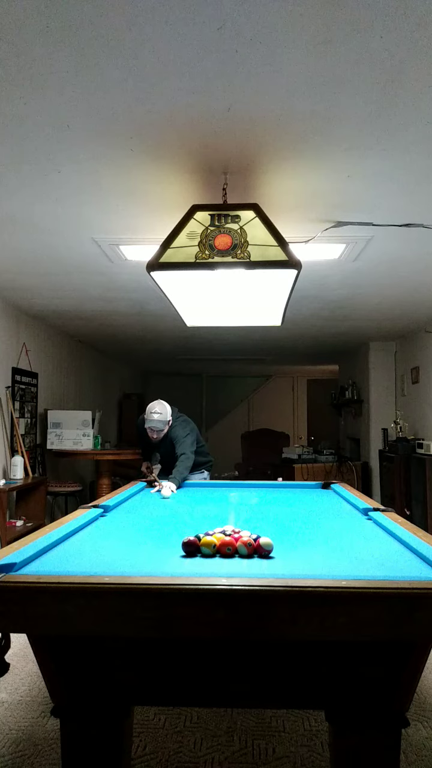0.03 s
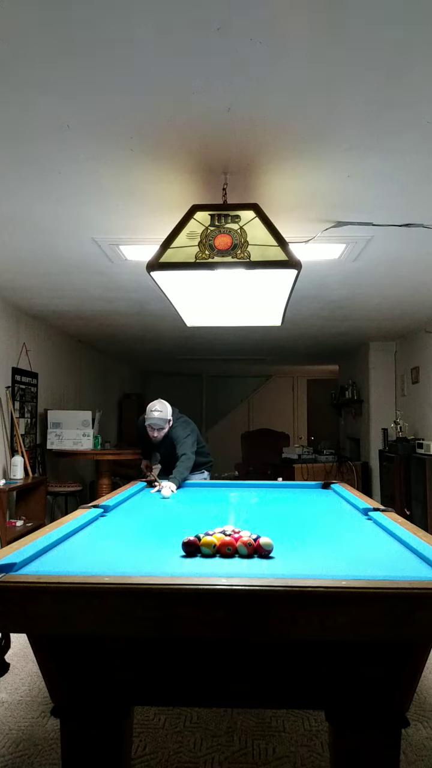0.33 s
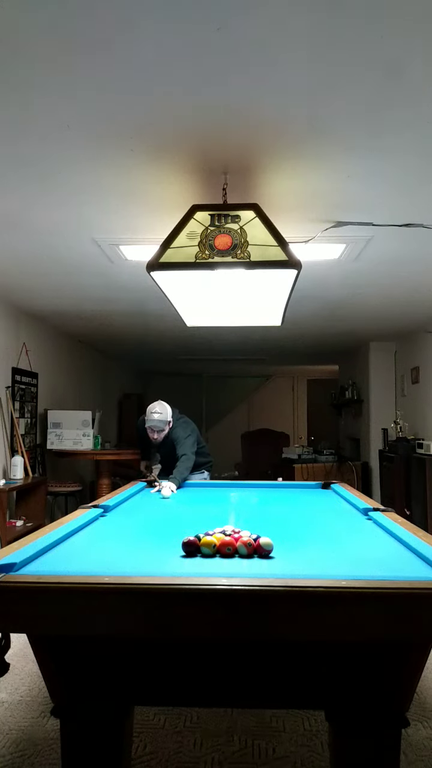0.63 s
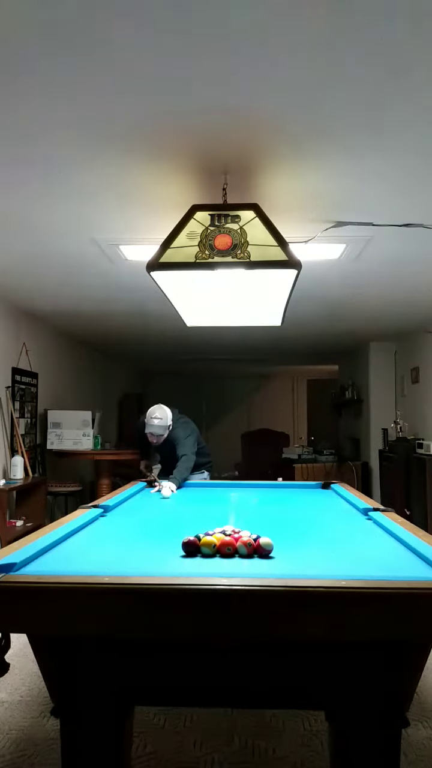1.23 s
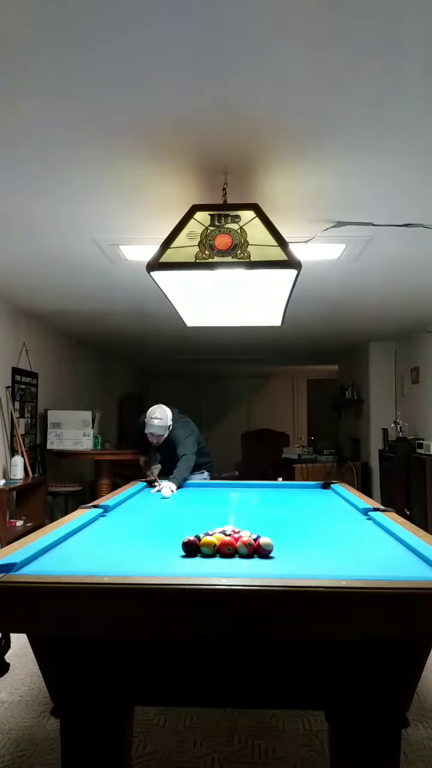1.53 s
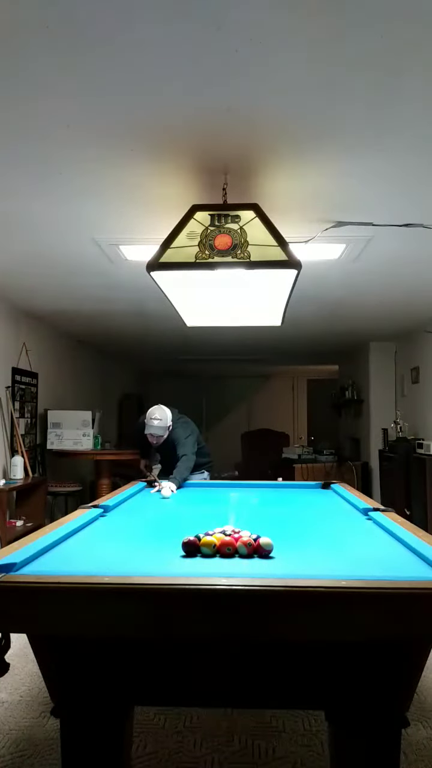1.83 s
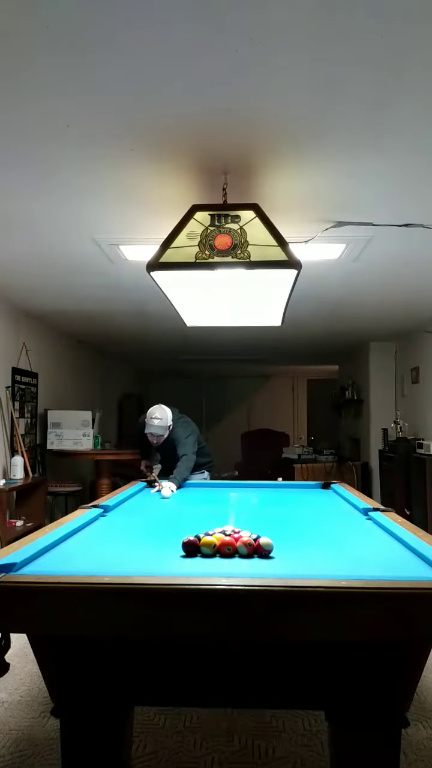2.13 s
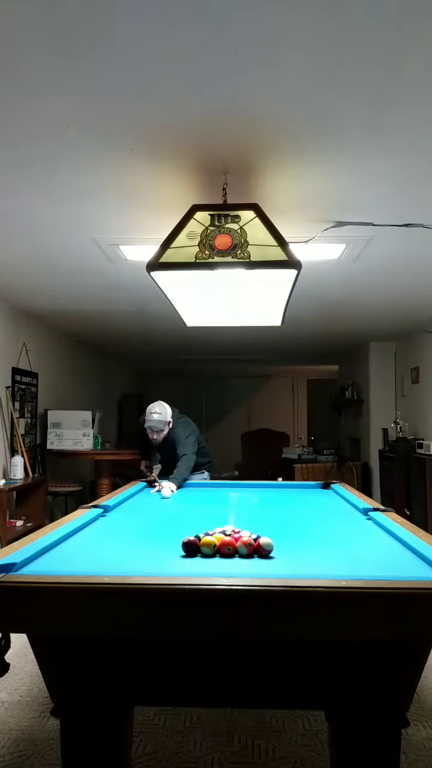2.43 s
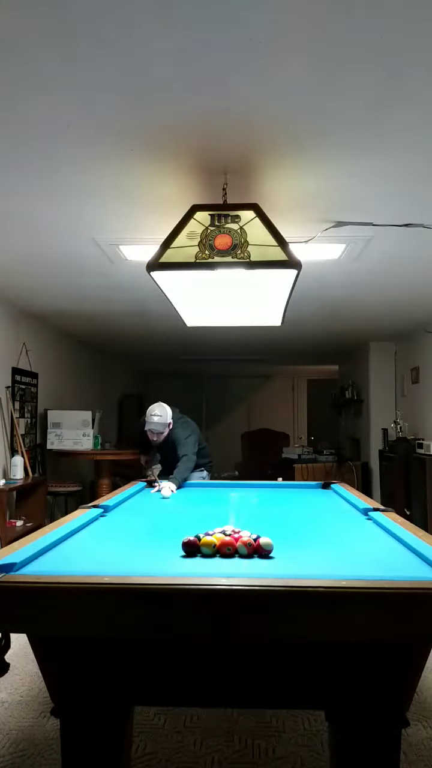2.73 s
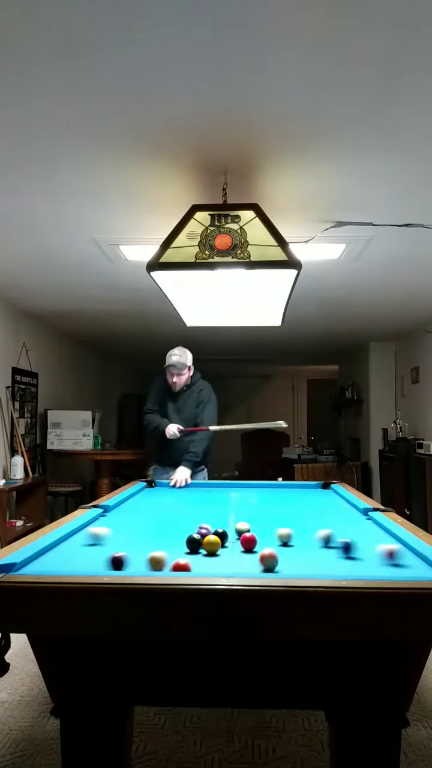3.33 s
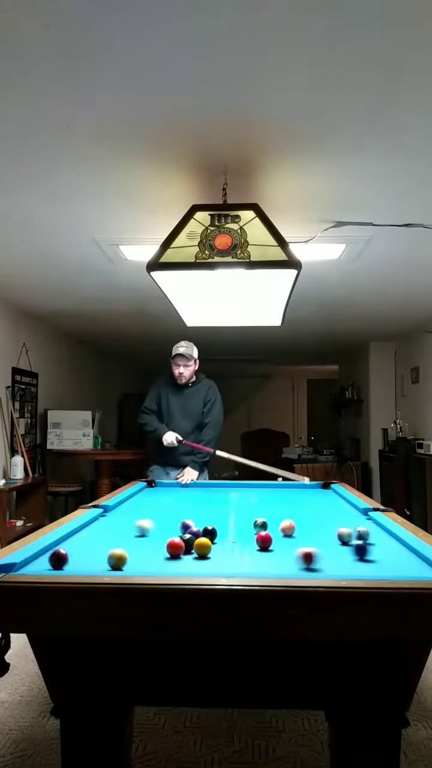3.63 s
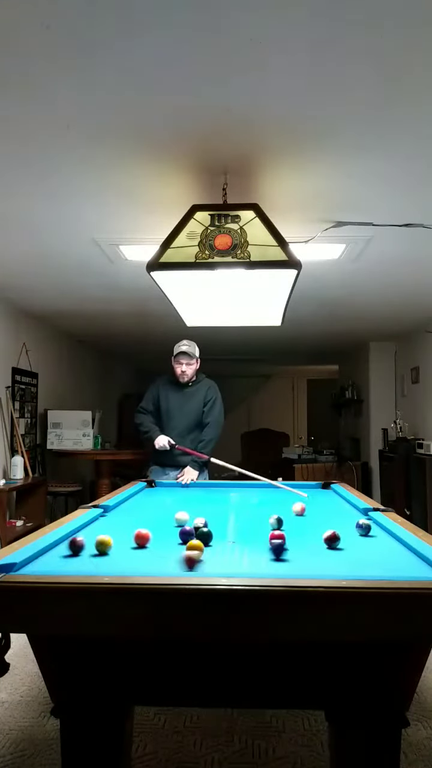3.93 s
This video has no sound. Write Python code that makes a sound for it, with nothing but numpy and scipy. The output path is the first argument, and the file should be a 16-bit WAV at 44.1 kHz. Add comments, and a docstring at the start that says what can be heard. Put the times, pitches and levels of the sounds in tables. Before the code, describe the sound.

A pool break is heard from close behind the rack in a quiet basement. For three seconds there is only a low ventilation drone and barely audible cue slides. At 3.1 seconds the cue gives a woody knock, and at about 3.3 the rack bursts with a loud, sharp crack. Balls thud and knock against the rails until 3.7, then clack together in two quick clusters around 3.8 and 3.9.

```python
"""A pool break in a quiet basement, heard from just behind the rack.
Faint practice strokes hiss, then the cue knocks the cue ball, which skips down the slate and cracks
into the rack. Balls thud into cushions, rattle at a pocket and clack together. Each contact is a short
pulse drawn out by the room; the wooden cue and table ring. The crack overloads the microphones and
ducks their gain. Ventilation drones underneath, dulled by a noise suppressor, with faint codec flicker."""
import sys
import numpy as np
from scipy import signal
from scipy.fft import rfft, irfft
from scipy.io import wavfile
from scipy.ndimage import uniform_filter1d

SR = 44100
rng = np.random.default_rng(int(sys.argv[2]) if len(sys.argv) > 2 else 0)


def wav_record(signal):
    """Record a signal, one row per channel, as 16-bit PCM in the file named by sys.argv[1]."""
    frames = np.transpose(np.atleast_2d(signal))
    bounded = np.clip(frames, -1, 1)
    # unit amplitude maps onto the largest positive 16-bit level
    quanta = np.round(bounded * 32767).astype(np.int16)
    wavfile.write(sys.argv[1], SR, quanta)


N = 176400


def rack_break():
    """The cue ball bursts the rack: hard balls crack without ringing, and the slate thumps."""
    # collisions: start_s, level_db, wet_db
    hits = [(3.2622, 29, 0.5), (3.308, 10, 10), (3.3626, 2.5, 11)]
    # crack spectrum: freq_hz, level_db
    crack_spectrum = [(30, -40.5), (80, -46), (400, -16.5), (800, -13), (1200, -4.5), (1650, 4),
                      (2150, -1.5), (2600, 4.5), (3100, -4), (4000, -14), (5200, -24.5), (6500, -34),
                      (9000, -39), (16000, -56)]
    # slate thump spectrum: freq_hz, level_db
    thump_spectrum = [(30, -16.5), (90, -7.5), (200, -0.5), (400, 0.5), (800, -5), (2000, -31), (8000, -67)]
    out, hz = np.zeros((2, N)), bins(4096)
    crack = pulse(curve(crack_spectrum, hz))
    for start_s, level_db, wet_db in hits:
        add(out, start_s, amp(level_db) * in_room(crack, wet_db))
    jolt = amp(20) * np.array([[1], [-0.3]])  # pushes the two microphones opposite ways
    add(out, hits[0][0], jolt * pulse(curve(thump_spectrum, hz)))
    return out


def ball_clacks():
    """Scattered balls meet more slowly; the longer contact notches the spectrum."""
    # contacts, with the 3.764 s clack repeated off ceiling and walls at 3.771, 3.781 and 3.790 s: start_s,
    # level_db, left_minus_right_db, wet_db
    hits = [(3.383, -3, -1, 8.5), (3.7639, 1.5, 2.5, 8), (3.7710, 2.5, 2, -1.5), (3.7810, -4, 1, -8),
            (3.7904, 1, 2, -6), (3.8723, -15, -10, 11), (3.8749, -3, 9, -4.5), (3.8778, 0, 3, -6),
            (3.888, -6, 6, 6.5)]
    # contact spectrum: freq_hz, level_db
    spectrum = [(30, -33), (100, -21), (400, -11.5), (850, -12), (1300, 0), (1900, -0.5), (2600, 0.5),
                (3400, -11.5), (4100, -32.5), (5000, -30), (6100, -37), (6600, -55.5), (7200, -37),
                (8200, -29.5), (9100, -44), (10100, -33), (11100, -42), (12000, -35), (13100, -42),
                (14200, -34), (16000, -52)]
    out = np.zeros((2, N))
    clack = pulse(curve(spectrum, bins(4096)))
    for start_s, level_db, pan_db, wet_db in hits:
        add(out, start_s, amp(level_db) * in_room(clack, wet_db, pan_db, echo_db=-7.5))
    return out


def cue_strike():
    """The shaft rings with a woody knock; the tip's snap arrives mostly off the walls."""
    # shaft modes: freq_hz, level_db, t60_s
    shaft_modes = [(370, -12, 0.25), (450, -2, 0.097), (688, 8, 0.021), (766, 10.5, 0.016), (870, 1, 0.013),
                   (950, -3, 0.023), (1270, -6, 0.092), (1557, -7.5, 0.15), (2190, -13.5, 0.045),
                   (2452, -7, 0.12), (2800, -10, 0.11)]
    # tip snap spectrum: freq_hz, level_db
    snap_spectrum = [(50, -45.5), (150, -21), (400, 1.5), (1200, 1), (2500, -2), (4300, -4), (5200, -11),
                     (8300, -10.5), (11000, -17.5), (13000, -27), (16000, -42.5)]
    start_s, contact_s, snap_lag_s = 3.1072, 0.0004, 0.00295
    out, t = np.zeros((2, N)), np.arange(SR // 2) / SR
    knock = ring(shaft_modes, t) * (1 - np.exp(-(t / contact_s) ** 2))
    knock = signal.sosfilt(signal.butter(2, 284, "high", fs=SR, output="sos"), knock)
    add(out, start_s, amp(12) * in_room(knock / np.linalg.norm(knock), wet_db=-6.5))
    snap = pulse(curve(snap_spectrum, bins(4096)))
    add(out, start_s + snap_lag_s, amp(13) * in_room(snap, wet_db=0, direct_db=-21.5))
    return out


def rail_knocks():
    """Balls hit rails and pocket jaws; the wooden table rings under each knock."""
    # impacts: start_s, level_db, left_minus_right_db
    hits = [(3.186, 6.5, 7), (3.537, 5.5, 1.5), (3.556, -7, -21), (3.578, 8.5, 2), (3.586, 5, -6),
            (3.612, -16, 7), (3.634, -6, -8), (3.664, -0.5, 0), (3.700, -10.5, 7)]
    # impact spectrum: freq_hz, level_db
    spectrum = [(30, -49.5), (100, -19), (260, -21.5), (380, 5.5), (480, 6.5), (680, 2.5), (790, -4),
                (900, -4.5), (1300, -13), (2600, -31), (4000, -55), (9000, -74.5), (16000, -89)]
    # table modes: freq_hz, level_db, t60_s
    table_modes = [(195, -3, 0.27), (265.6, -13, 0.4), (404, -0.5, 0.73), (481, 1, 0.229),
                   (676, -1.5, 0.39), (900, 0, 0.24)]
    out, hz = np.zeros((2, N)), bins(32768)
    wood = ring(table_modes, np.arange(len(hz)) / SR)
    knock = pulse(curve(spectrum, hz)) + amp(-7) * wood / np.linalg.norm(wood)
    for start_s, level_db, pan_db in hits:
        add(out, start_s, amp(level_db) * in_room(knock, wet_db=-4, pan_db=pan_db, direct_db=-7.5))
    return out


def ball_thuds():
    """Balls land on the slate or sink into a cushion: soft, low band-limited pulses."""
    # impacts: start_s, level_db, pitch_hz
    hits = [(3.137, 6.5, 321), (3.183, 5, 248), (3.223, 2, 262), (3.250, 4.5, 210), (3.386, 5, 140),
            (3.402, 1.5, 140.6), (3.476, 0, 146), (3.520, 1.5, 140), (3.554, 2.5, 161), (3.622, 6.5, 169),
            (3.660, 1.5, 200), (3.686, 0.5, 168), (3.706, -1.5, 160), (3.796, -11.5, 188)]
    low_db_per_oct, high_db_per_oct, width_oct = 26, 14, 0.47
    out, hz = np.zeros((2, N)), bins(32768)
    for start_s, level_db, pitch_hz in hits:
        octaves = np.log2((hz + 1) / pitch_hz)
        low_cut_db = low_db_per_oct * np.maximum(-octaves - width_oct, 0)
        high_cut_db = high_db_per_oct * np.maximum(octaves - width_oct / 2, 0)
        thud = pulse(-low_cut_db - high_cut_db)
        add(out, start_s, amp(level_db) * in_room(thud, wet_db=-3.5, direct_db=-10))
    return out


def cue_slides():
    """The shaft slides through the bridge hand; friction hiss swells with each stroke."""
    # strokes: start_s, length_s, level_db
    strokes = [(.05, 0.27, -86), (.4, .18, -84), (.62, .45, -82.5), (1.1, .45, -84), (1.62, .24, -82),
               (2.9, 0.074, -82), (3.023, 0.21, -73)]
    # friction spectrum: freq_hz, level_db
    spectrum = [(2500, -20), (3300, -1), (3800, -17), (4400, 0), (5300, -12), (6800, -15), (7800, 0),
                (8800, -12), (11500, -10), (15000, -24)]
    speed, t = np.zeros(N), np.arange(N) / SR
    for start_s, length_s, level_db in strokes:
        progress = np.clip((t - start_s) / length_s, 0, 1)
        speed += amp(level_db) * np.sqrt(np.abs(np.sin(np.pi * progress)))
    return speed * unit_rms(irfft(diffuse(N) * amp(curve(spectrum, bins(N)))))


def ventilation():
    """Three low resonances drone over the dull background noise."""
    # resonances: centre_hz, half_width_hz, level_db
    drones = [(75.5, 4.3, -53), (115.8, 14.3, -52.5), (190.5, 10, -49.5)]
    start_s, rise_s = 0.038, 0.0037
    air = suppressed_noise()
    for centre_hz, half_width_hz, level_db in drones:
        drone = irfft(diffuse(N) / (1 + ((bins(N) - centre_hz) / half_width_hz) ** 2))
        air += amp(level_db) * unit_rms(drone)
    return air * np.clip((np.arange(N) / SR - start_s) / rise_s, 0, 1)


def suppressed_noise():
    """Noise cut off near 2.5 kHz by a wavering suppressor; audio coding adds a watery treble flicker."""
    # background spectrum: freq_hz, density_db
    spectrum = [(20, -11), (45, -22), (70, -14.5), (130, 1), (200, -5), (260, -1.5), (450, -4.5), (560, -7),
                (700, -3.5), (850, -10.5), (1400, -6.5), (1900, -12), (2250, -18.5), (2450, -25),
                (2700, -43.5), (4500, -41.5), (5500, -51.5), (8000, -49.5), (10000, -56), (16000, -56)]
    suppressor_hz, suppressor_drift_hz = 2540, 39
    noise = irfft(diffuse(N) * amp(curve(spectrum, bins(N))))
    hz, t, frames = signal.stft(noise, SR, nperseg=1024)
    hz = hz[:, None]
    codec_patches = uniform_filter1d(rng.standard_normal(frames.shape[1:]), size=8, axis=0)
    codec_patches = unit_rms(uniform_filter1d(codec_patches, size=8, axis=1))
    codec_db = np.where(hz > suppressor_hz, 2.6, 1) * codec_patches
    shift_hz = suppressor_drift_hz * unit_rms(uniform_filter1d(rng.standard_normal(len(t)), size=16))
    near_cutoff = np.exp(-((hz - suppressor_hz) / 500) ** 2)
    suppressor_db = curve(spectrum, np.abs(hz + near_cutoff * shift_hz)) - curve(spectrum, hz)
    noise = signal.istft(frames * amp(codec_db + suppressor_db), nperseg=1024)[1][:, :N]
    return amp(-46.5) * unit_rms(noise)


def in_room(sound, wet_db, pan_db=0, direct_db=0, echo_db=0):
    """Direct path and first reflections, both scaled by direct_db, plus reverberation."""
    # reflections off lamp, ceiling and walls: delay_s, level_db
    echoes = [(.0037, -2.5), (.0066, -0.5), (.0085, -4), (.0143, -4.5), (0.0172, -11), (.027, -14)]
    spread_s = 0.00046
    paths = np.zeros((2, SR))
    paths[:, 0] = amp([pan_db / 2, -pan_db / 2])
    for delay_s, level_db in echoes:
        arrival_s = delay_s + spread_s * rng.uniform(-0.5, 0.61, 2)
        paths[[0, 1], (arrival_s * SR).astype(int)] += amp(level_db + echo_db)
    return signal.fftconvolve(amp(direct_db) * paths + amp(wet_db) * reverb(), sound[None], axes=1)


def reverb():
    """Basement response: a quick decay by band and a faint longer one, strongest in the treble."""
    # quick decay: freq_hz, t60_s
    decay = [(100, 0.4), (400, 0.64), (900, 0.37), (2000, 0.32), (4000, .35), (8000, 0.23), (15000, 0.16)]
    # late tail: freq_hz, level_db
    late = [(500, -22), (2500, -25), (5000, -22), (9000, -15.5), (14000, -11)]
    build_s, late_t60_s = 0.0033, 0.73
    hz, t, frames = signal.stft(irfft(diffuse(SR)), SR, nperseg=256)
    quick_fade = amp(-60 * t / curve(decay, hz)[:, None])
    late_fade = amp(curve(late, hz)[:, None] - 60 * t / late_t60_s)
    tail = signal.istft(frames * (quick_fade + late_fade), SR, nperseg=256)[1][:, :SR]
    tail *= 1 - np.exp(-(np.arange(SR) / SR / build_s) ** 2)
    return tail / np.linalg.norm(tail) * np.sqrt(2)


def diffuse(size):
    """Spectra of noise arriving from all around at two microphones."""
    # channel likeness: freq_hz, correlation (capped at 1)
    likeness = [(30, 0.7), (65, 1.2), (130, 1.04), (300, 1), (650, 0.78), (1100, 0.26), (1600, -0.27),
                (2500, 0), (6000, 0)]
    left, independent = rfft(rng.standard_normal((2, size)))
    correlation = np.clip(curve(likeness, bins(size)), -1, 1)
    return np.array([left, correlation * left + np.sqrt(1 - correlation ** 2) * independent])


def pulse(spectrum_db):
    """Minimum-phase pulse of unit energy with this spectral shape."""
    log_gain = np.log(amp(np.r_[spectrum_db, spectrum_db[-2:0:-1]]))
    spectrum = np.exp(np.conj(signal.hilbert(log_gain)))
    wave = np.fft.ifft(spectrum).real[:len(spectrum_db)]
    return wave / np.linalg.norm(wave)


def ring(modes, t):
    """Sum of decaying sines."""
    return sum(amp(db - 60 * t / t60_s) * np.sin(2 * np.pi * hz * t) for hz, db, t60_s in modes)


def amp(db):
    """Decibels to gain."""
    return 10 ** (np.asarray(db) / 20)


def unit_rms(x):
    """Scales to rms 1."""
    return x / np.sqrt(np.mean(x ** 2) + 1e-20)


def curve(points, hz):
    """Interpolates a table along log frequency."""
    point_hz, values = np.transpose(points)
    return np.interp(np.log(hz + 1), np.log(point_hz + 1), values)


def bins(size):
    """FFT bin frequencies in Hz."""
    return np.fft.rfftfreq(size, 1 / SR)


def add(mix, start_s, sound):
    """Mixes in a stereo sound."""
    part = mix[:, round(start_s * SR):][:, :sound.shape[1]]
    part += sound[:, :part.shape[1]]


def scene():
    """Aim, stroke, break and scatter over the ventilation."""
    shot = cue_slides() + cue_strike() + rack_break()
    return shot + ball_clacks() + ball_thuds() + rail_knocks() + ventilation()


def record(dry):
    """Unequal microphones, soft overload, look-ahead limiter, full-scale clip and low-pass."""
    # microphone balance: freq_hz, left_minus_right_db
    balance = [(70, 1.5), (200, -0.5), (700, -1.5), (1100, -2.5), (1500, -6.5), (2100, -13.5), (2800, 2),
               (4500, -1), (8000, 3.5)]
    ceiling, knee, cutoff_hz = 2.07, 15, 16150
    threshold_db, ratio, release_db_per_s, sense_s, ahead_s = -11, 2.63, 106, 0.0039, 0.0015
    tilt_db = curve(balance, bins(2 * N)) / 2
    x = irfft(rfft(dry, 2 * N) * amp([tilt_db, -tilt_db]))[:, :N]
    x = x / (1 + np.abs(x / ceiling) ** knee) ** (1 / knee)
    pole = np.exp(-1 / (sense_s * SR))
    power_db = 10 * np.log10(signal.lfilter([1 - pole], [1, -pole], (x ** 2).mean(0)) + 1e-12)
    t = np.arange(N) / SR
    release_db = t * release_db_per_s
    held_db = np.maximum.accumulate(power_db + release_db) - release_db
    over_db = np.maximum(held_db - threshold_db, 0)
    duck_db = np.interp(t + ahead_s, t, over_db) * (1 - 1 / ratio)
    x = np.clip(x * amp(-duck_db), -1, 1)
    lowpass = signal.firwin(511, cutoff_hz, window=("kaiser", 9), fs=SR)
    return signal.oaconvolve(x, lowpass[None], "same")


dry = scene()
out = record(dry)
wav_record(out)
```